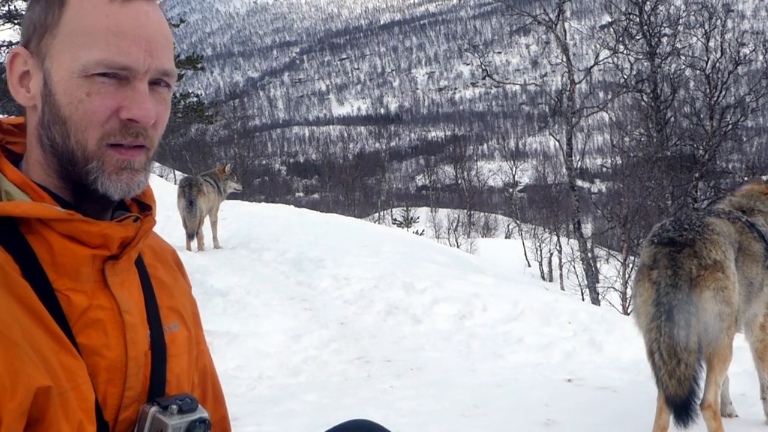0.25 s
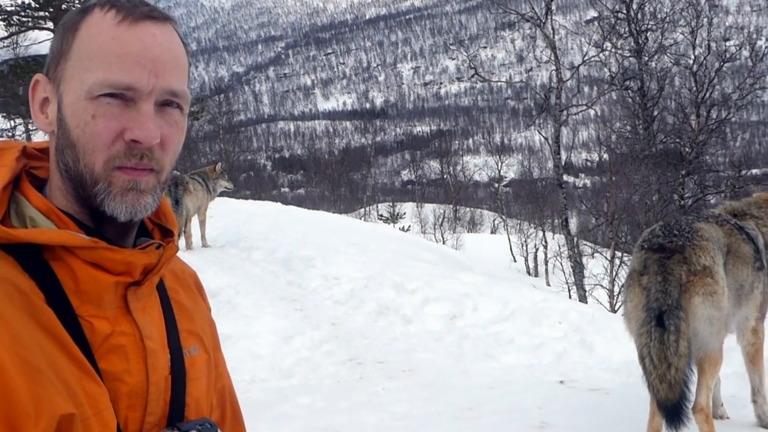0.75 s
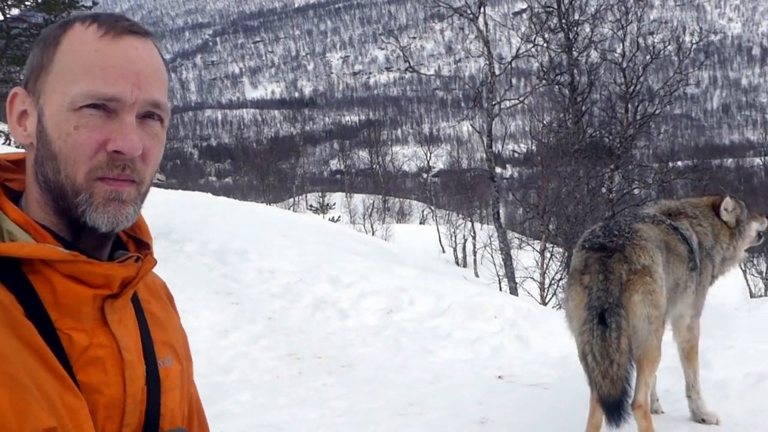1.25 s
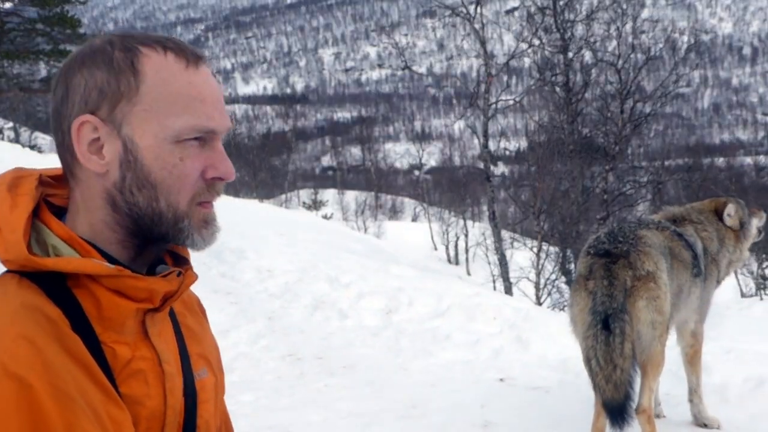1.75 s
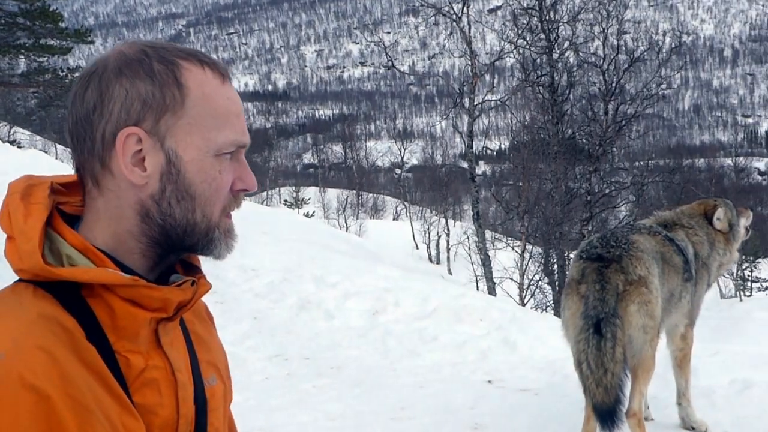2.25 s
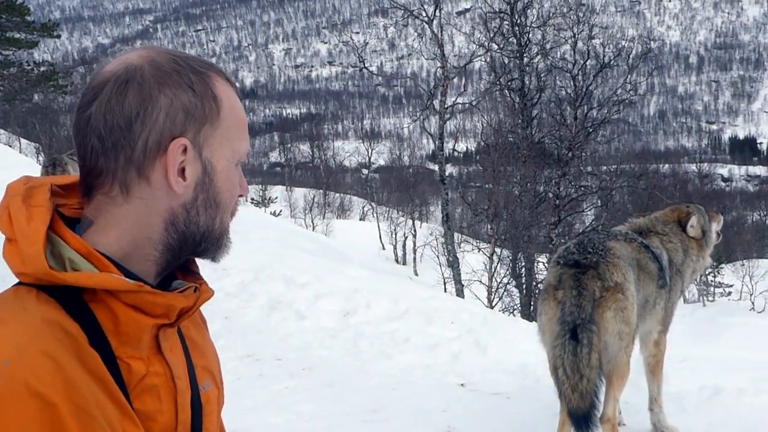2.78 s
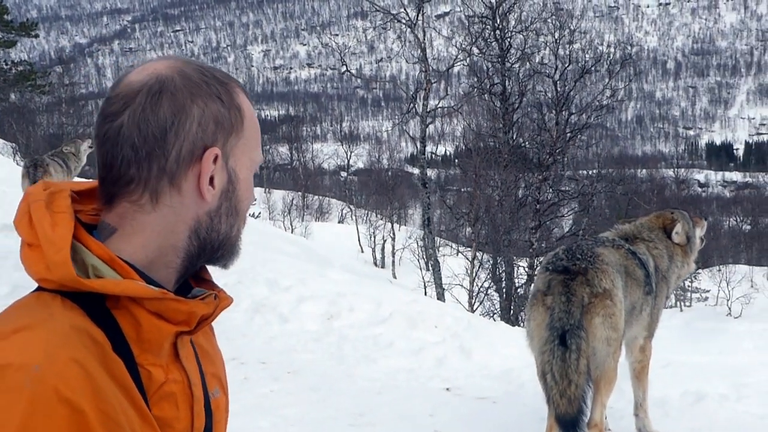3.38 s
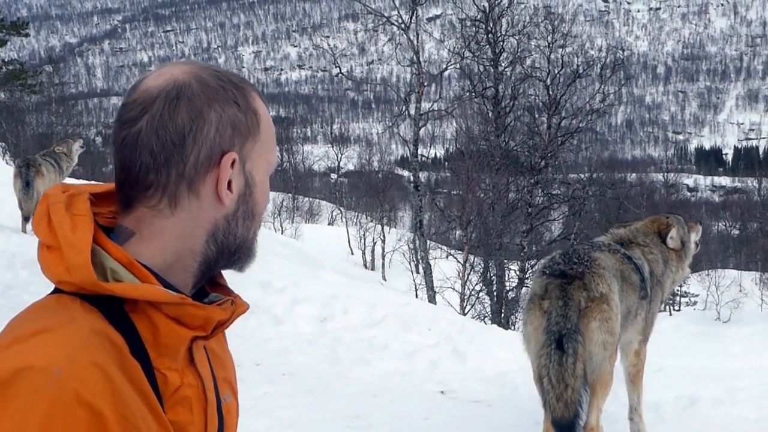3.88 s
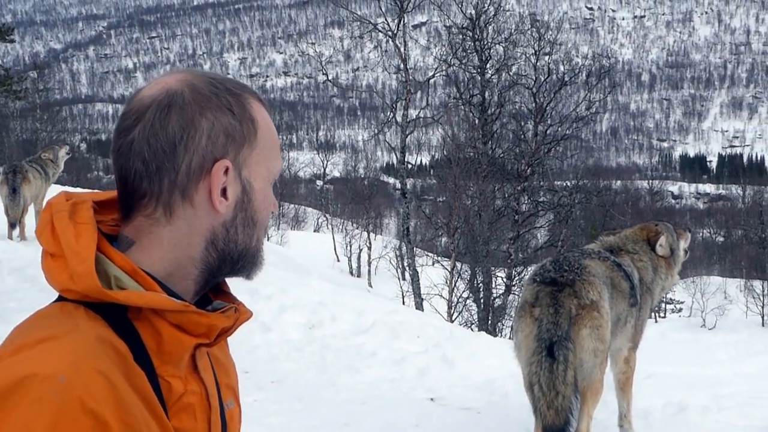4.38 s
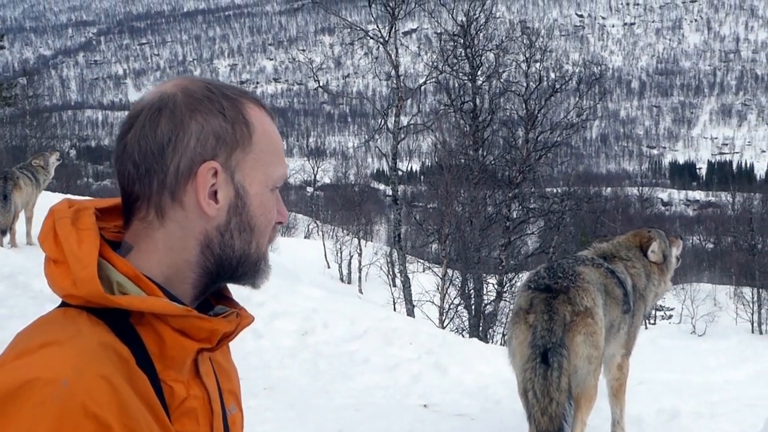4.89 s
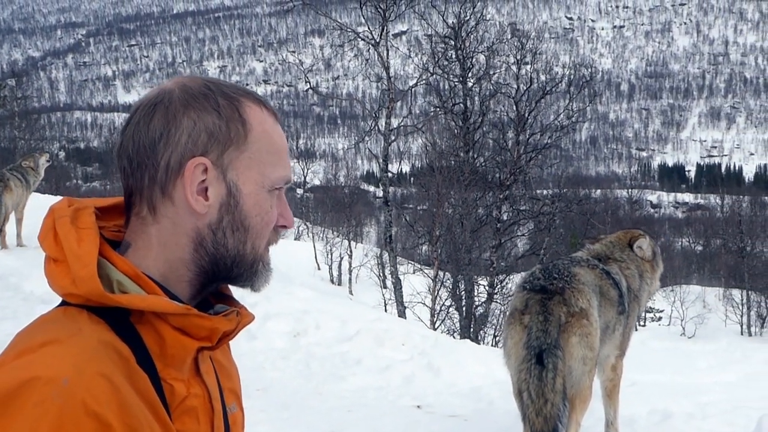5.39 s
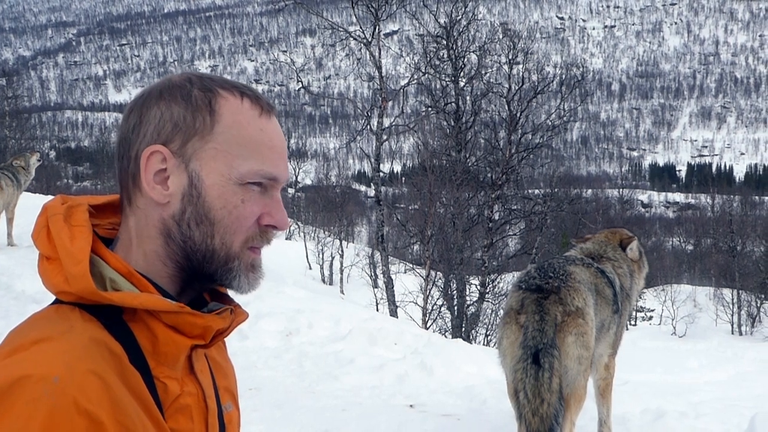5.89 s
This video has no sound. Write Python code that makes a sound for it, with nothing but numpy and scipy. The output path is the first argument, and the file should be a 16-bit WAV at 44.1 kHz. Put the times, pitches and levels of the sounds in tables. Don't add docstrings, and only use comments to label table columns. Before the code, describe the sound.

A handheld stereo microphone close to one wolf catches a pack chorus in a snowy valley. Far howls slide downward, soft and hoarse; then the near wolf's pure, powerful howl leaps up and settles lower, with a second wolf gliding high before falling to join it. Wind rumbles and pops in the ports, fading late. Near the end the close voice sags and flips, with slight paw crunches in snow.

```python
import sys
import numpy as np
from scipy import signal
from scipy.fft import rfft, irfft
from scipy.io import wavfile
from scipy.ndimage import uniform_filter1d

SR = 44100
rng = np.random.default_rng(int(sys.argv[2]) if len(sys.argv) > 2 else 0)


def volts_from_decibels(level):
    exponent = np.asarray(level, float) / 20
    return 10 ** exponent


def materialize(psi):
    bounded = np.clip(np.atleast_2d(psi).T, -1, 1)
    quanta = np.round(bounded * 32767).astype(np.int16)
    wavfile.write(sys.argv[1], SR, quanta)


N = 270774


def evened(x):
    return x / np.sqrt(np.mean(x ** 2) + 1e-20)


def read(points, hz):
    f, value = np.transpose(points)
    return np.interp(np.log(hz + 1), np.log(f + 1), value)


def curve(points, x):
    return np.interp(x, *np.transpose(points))


def add(mix, start_s, sound):
    part = mix[..., round(start_s * SR):][..., :sound.shape[-1]]
    part += sound[..., :part.shape[-1]]


def sided(x, lean_db):
    return x * volts_from_decibels(np.array([lean_db / 2, -lean_db / 2]).reshape(2, -1))


def drift(size, hz):
    return evened(signal.lfilter(*signal.butter(2, hz, fs=SR), rng.standard_normal(size)))


def bandpass(x, low_hz, high_hz, order):
    return signal.lfilter(*signal.butter(order, [low_hz, high_hz], "band", fs=SR), x)


def highpass(x, hz, order):
    return signal.sosfilt(signal.butter(order, hz, "high", fs=SR, output="sos"), x)


def peaks(modes, hz):
    return sum(volts_from_decibels(db) / (1 + (2 * (hz - centre_hz) / width_hz) ** 4) for centre_hz, width_hz, db in modes)


def noise(spectrum, same, flicker_db=0):
    frames, hz = N // 128 + 5, np.fft.rfftfreq(512, 1 / SR)
    a, b, c, d = rng.standard_normal((frames, 257, 4)).T
    left, other = a + 1j * b, c + 1j * d
    same = np.clip(same(hz), -1, 1)[:, None]
    z = np.array([left, same * left + np.sqrt(1 - same ** 2) * other])
    patches = uniform_filter1d(rng.standard_normal((257, frames)), 6, 0)
    patches = evened(uniform_filter1d(patches, 20, 1))
    z *= volts_from_decibels(read(spectrum, hz)[:, None] + flicker_db * patches)
    return evened(signal.istft(z, nperseg=512, noverlap=384)[1][:, :N])


def floor():
    # pitch_hz, level_db per Hz
    hiss = [(900, -17), (1500, -12), (2200, -9), (2900, -4.5), (4400, -2), (5600, -11.5), (6500, -6),
            (8000, -9.5), (9300, -7), (11500, -6.5), (15500, -27)]
    # pitch_hz, likeness (0-1)
    hiss_same = [(1000, .7), (3000, .45), (5000, .5), (12000, .55)]
    hiss_db = -65
    air_db = -66
    air_spectrum = [(60, -30), (300, -8), (680, 4), (1100, -2), (2200, -8), (3000, -25), (5000, -60)]
    air = noise(air_spectrum, lambda hz: .8 + 0 * hz, 1.5)
    return volts_from_decibels(hiss_db) * noise(hiss, lambda hz: read(hiss_same, hz), 1.2) + volts_from_decibels(air_db) * air


def wind_db(t):
    # time_s, level_db
    breeze = [(0, -62), (.44, -52), (.56, -38), (1.0, -36.5), (2.0, -36), (2.2, -45), (2.85, -35),
              (3.12, -31), (3.3, -34), (3.47, -44), (4.39, -39), (4.5, -61), (5.7, -51), (5.9, -68),
              (6.09, -70), (6.14, -57)]
    # peak_s, peak_db, fall_s per 10 dB
    gusts = [(0, -50.5, .1), (.15, -47.5, .07), (.36, -44.5, .07), (1.15, -25, .08), (1.35, -22.5, .13),
             (1.61, -23.5, .15), (1.9, -26, .25), (2.105, -21, .03), (2.51, -27, .33), (3.38, -29, .06),
             (3.57, -28.5, .1), (3.76, -30.5, .25), (4.11, -31, .17), (4.87, -45, .08), (5.16, -46, .13),
             (5.44, -31, .035), (5.8, -32.5, .035)]
    rise_share = .75
    levels = [db - 10 * np.maximum(t - s, (s - t) / rise_share) / fall_s for s, db, fall_s in gusts]
    return np.max([curve(breeze, t), *levels], axis=0)


def thumps(mix):
    # crest_s, peak_db, left_right_db, pitch_hz
    strikes = [(0.154, -37.0, 15.5, 138), (0.347, -35.8, 14.0, 163), (0.547, -29.0, 16.1, 196),
               (0.6, -28.3, 4.3, 157), (0.774, -28.0, -7.9, 236), (0.939, -24.6, -6.3, 212),
               (1.065, -21.7, 12.9, 179), (1.095, -18.9, 1.8, 235), (1.142, -17.3, 16.7, 183),
               (1.174, -18.8, 7.0, 222), (1.307, -15.2, 14.6, 234), (1.396, -12.4, 12.1, 218),
               (1.418, -15.1, -16.2, 209), (1.563, -20.2, -3.2, 208), (1.629, -17.3, 8.6, 216),
               (1.696, -15.8, 6.4, 246), (1.898, -22.0, 18.0, 183), (2.093, -13.7, 14.9, 228),
               (2.324, -22.5, -18.0, 177), (2.402, -21.9, -8.5, 234), (2.466, -19.1, -14.4, 204),
               (2.495, -14.9, -15.1, 214), (2.557, -17.7, -14.3, 226), (2.687, -17.6, -14.3, 178),
               (2.887, -18.5, -13.9, 208), (2.926, -22.9, -13.6, 204), (3.07, -23.0, -12.0, 207),
               (3.13, -20.3, 1.8, 207), (3.319, -24.0, -16.5, 213), (3.379, -18.6, -15.1, 195),
               (3.532, -22.6, -11.6, 203), (3.571, -19.4, -16.0, 230), (3.733, -20.6, -10.9, 151),
               (3.788, -21.9, -18.0, 216), (3.894, -24.4, -14.6, 165), (4.114, -19.6, -13.1, 173),
               (4.156, -22.7, -14.5, 193), (4.187, -20.5, -13.9, 223), (4.286, -22.7, -15.1, 157),
               (4.387, -28.3, -13.6, 221), (4.808, -38.4, -17.9, 144), (4.861, -37.1, -13.7, 165),
               (4.885, -39.6, -17.2, 155), (5.108, -37.8, -7.5, 183), (5.168, -37.0, -11.7, 134),
               (5.41, -32.6, -0.5, 236), (5.443, -25.2, -13.0, 185), (5.789, -20.3, -11.7, 196)]
    crest_cycles, trim_db = .62, 1.5
    for (s, db, lean_db, pitch_hz), phase in zip(strikes, rng.random(len(strikes))):
        u = np.arange(2400) / SR * pitch_hz / crest_cycles
        push = np.sin(2 * np.pi * (crest_cycles * u + phase)) * u ** 2 * np.exp(2 - 2 * u)
        push = sided(highpass(push, 90, 5), lean_db) / np.sqrt(np.cosh(lean_db * np.log(10) / 20))
        add(mix, max(s - crest_cycles / pitch_hz, 0), volts_from_decibels(db + trim_db) * push)


def wind():
    # pitch_hz, level_db
    buffet = [(30, -42), (50, -42), (70, -21.5), (110, -3.5), (190, 1.5), (300, -4), (450, -15), (800, -29),
              (1500, -49.5), (3000, -73)]
    # time_s, left_right_db
    wind_lean = [(0, 3.5), (1.8, 4), (2.4, -7), (4.4, -8), (6.14, -0.5)]
    # pitch_hz, level_db per Hz
    rumble = [(70, -3), (110, 0), (170, -8), (260, -30), (600, -70)]
    rumble_db = -57
    lumps_db, lumps_hz = 3.0, 22
    pops_per_s, pops_db, spread_db = 28, 22, 5.0

    t, hz = np.arange(N) / SR, np.fft.rfftfreq(N, 1 / SR)
    shared = drift(N, lumps_hz)
    lumps = volts_from_decibels(lumps_db * np.array([.6 * shared + 2.1 * drift(N, lumps_hz) for _ in range(2)]))
    raw = rng.standard_normal((2, N))
    raw[1] = 0.72 * raw[0] + 1.1 * raw[1]
    raw *= lumps / np.sqrt(uniform_filter1d(lumps ** 2, 6000))

    size = volts_from_decibels(pops_db + spread_db * np.minimum(rng.exponential(1, (2, N)), 3))
    size *= rng.choice([-1, 1], (2, N))
    pops = size * (rng.random((2, N)) < pops_per_s / SR)
    raw = evened(raw + pops) * volts_from_decibels(wind_db(t) - 0.8)

    gain = volts_from_decibels(read(buffet, hz))
    eddies = irfft(rfft(raw) * gain, N) / np.sqrt(np.mean(gain ** 2))
    eddies = sided(eddies, curve(wind_lean, t))
    thumps(eddies)
    bed = volts_from_decibels(rumble_db) * noise(rumble, lambda hz: .5 + 0 * hz, 3)
    return eddies + highpass(bed, 75, 6)


def ticks(mix):
    # start_s, peak_db, centre_hz, left_right_db
    snaps = [
        (2.5885, -44.5, 11710, 2.5),
        (3.245, -48, 11080, -3.5),
        (3.345, -50, 12200, 1),
        (5.0374, -49, 11620, 2.5),
        (5.1043, -41.5, 4000, 6),
        (5.3442, -40.5, 4146, 8),
    ]
    t = np.arange(400) / SR
    for s, db, hz, lean_db in snaps:
        burst = rng.standard_normal(400) * np.exp(-t / .0012)
        ring = bandpass(burst, .8 * hz, 1.13 * hz, 2)
        add(mix, s, sided(volts_from_decibels(db) * ring / abs(ring).max(), lean_db))


def crunches(mix):
    # start_s, length_s, level_db, centre_hz
    steps = [(.06, .2, -68, 3600), (.075, .04, -57, 1250), (.17, .08, -63, 1250), (.79, .03, -62, 1700),
             (1.1, .04, -52, 650), (1.78, .2, -67, 3400), (3.07, .12, -68, 3700), (3.62, .07, -62, 2000),
             (3.71, .06, -58, 1900), (3.8, .06, -59, 1900), (3.9, .06, -60, 1950), (4.01, .06, -58, 1850),
             (3.85, .16, -65, 3300), (5.68, .09, -64, 3400), (5.68, .2, -60, 1900), (5.86, .2, -66, 2200),
             (3.5, .2, -63, 1750), (3.3, .2, -65, 1800), (5.75, .09, -61, 2600), (5.85, .08, -63, 3000),
             (5.95, .08, -63, 2800), (5.4, .2, -63, 1600)]
    for s, length_s, db, hz in steps:
        grains = rng.standard_normal((2, 9000)) * volts_from_decibels(2.5 * rng.exponential(1, 9000))
        grains = (grains + grains[0])[:, :int(length_s * SR)]
        grains = bandpass(grains, .72 * hz, 1.28 * hz, 3)
        add(mix, s, volts_from_decibels(db) * evened(grains) * np.hanning(grains.shape[1]))


def small():
    out = np.zeros((2, N))
    ticks(out)
    crunches(out)
    return out


def hills(x):
    # pitch_hz, t60_s
    echo_t60 = [(200, 0.57), (800, 0.52), (2000, .5), (8000, .3)]
    taps = np.zeros((2, SR))
    at = np.arange(1800, SR - 20, 20) + rng.integers(0, 20, (2, (SR - 1801) // 20))
    np.put_along_axis(taps, at, rng.choice([-1., 1.], at.shape), 1)
    taps[1] = .8 * taps[0] + .6 * taps[1]
    hz, t, z = signal.stft(taps, SR, nperseg=256)
    tail = signal.istft(z * volts_from_decibels(-60 * t / read(echo_t60, hz)[:, None]), SR, nperseg=256)[1]
    return signal.fftconvolve(x.mean(0)[None], tail / np.linalg.norm(tail[0]), axes=1)[:, :N]


def howl(rows, third, strain, throat, mouth=(), waver=.003, hoarse=((0, -38),), roll_db=0,
         jaw=((0, 0, 1, 0, 1),)):
    s, *columns = np.transpose(rows)
    t = np.arange(s[0], s[-1], 1 / SR)
    hz, effort_db, edge_db = (uniform_filter1d(np.interp(t, s, c), 300) for c in columns)
    jaw_s, *shape = np.transpose(jaw)
    jaw_db, stretch, open_db, reach = (np.interp(t, jaw_s, c) for c in shape)
    third_db = jaw_db + curve(third, hz) + 1.6 * drift(len(t), 12)
    strain_db = curve(strain, t)

    phase = 2 * np.pi * np.cumsum(hz * (1 + waver * drift(len(t), 40))) / SR
    shimmer = 1 + volts_from_decibels(curve(hoarse, t)) * drift(len(t), 380)
    partials = zip((1, 2, 3), (effort_db, edge_db, third_db))
    voice = sum(volts_from_decibels(db) * np.sin(k * phase) for k, db in partials) * shimmer

    slow = slice(None, None, 64)
    shut_db = 0.098 * np.maximum(330 - hz[slow], 0)
    for k in range(4, int((throat[-1][0] + 900) / hz.min())):
        gain = volts_from_decibels(strain_db[slow] + roll_db * max(k - 6, 0)) * peaks(throat, k * (hz / stretch)[slow])
        mouth_db = open_db[slow] + third_db[slow] - 7.5 * (k - 4) - shut_db
        gain = gain + volts_from_decibels(mouth_db) * peaks(mouth, k * (hz / reach)[slow])
        come_and_go = evened(uniform_filter1d(rng.standard_normal(len(gain)), 60))
        gain = gain * volts_from_decibels((1.4 + .12 * k) * come_and_go)
        voice += np.repeat(gain, 64)[:len(t)] * np.sin(k * phase + k * k) * (2 * shimmer - 1)

    fade_in, fade_out = t - s[0] + (s[0] == 0), s[-1] - t + (s[-1] > 6.13)
    fade = np.minimum(1, np.minimum(fade_in, fade_out) / .015)
    return s[0], np.sqrt(2) * voice * fade


def far_wolves(out):
    # time_s, pitch_hz, first_partial_db, second_partial_db
    far_high = [(0.0, 497, -44, -56), (0.14, 508, -43, -53), (0.36, 490, -45, -56),
                (0.585, 461, -45.5, -54), (0.915, 423, -41, -57), (1.3, 370, -46.5, -47)]
    far_long = [(0, 484, -52, -60), (.09, 469, -51, -52), (.15, 432, -41.5, -53), (.3, 419, -42, -55),
                (.765, 407.6, -42.5, -62), (1.4, 369, -39.5, -60), (1.75, 389, -43, -59),
                (2.35, 368, -45, -58), (3.3, 363, -53, -66)]
    far_drop = [(2.27, 695, -41, -56), (2.37, 658, -41, -47), (2.45, 615, -48, -48),
                (2.62, 549, -54.5, -63.5)]
    far_low = [(3.75, 295.4, -49, -56.5), (4.125, 312, -54, -51.5), (5, 322, -62, -50.5),
               (5.35, 310, -59, -48.5)]
    far_last = [(5.75, 528, -67, -58.5), (6.14, 542, -59.5, -53)]
    # pitch_hz, level_db
    high_third = [(370, -74), (422, -49), (440, -54), (456, -62), (505, -68)]
    # time_s, level_db
    high_strain = [(0, -52), (.7, -56), (.92, -70), (1.3, -60)]
    long_strain = [(.12, -84), (.2, -68), (.5, -63), (2.9, -64), (3.2, -78)]
    # centre_hz, width_hz, level_db
    far_throat = [(1500, 300, -8), (1900, 400, 0), (2450, 300, -26)]
    for rows, third, strain, lean_db in [
            (far_high, high_third, high_strain, -.6),
            (far_long, [(0, -72)], long_strain, -.4),
            (far_drop, [(0, -66)], [(0, -68)], .2),
            (far_low, [(0, -67)], [(0, -67)], .2),
            (far_last, [(0, -81)], [(0, -72)], .2)]:
        s, sound = howl(rows, third, strain, far_throat, waver=.0023, roll_db=-3.5, hoarse=[(0, -20)])
        add(out, s, sided(sound, lean_db))


def second_wolf(out):
    # time_s, pitch_hz, first_partial_db, second_partial_db
    second_rise = [(1.7, 528, -52, -65), (1.76, 566, -44, -52), (1.895, 582, -43, -50),
                   (1.97, 558, -54, -57), (2.06, 598, -45, -50), (2.125, 648, -31, -46),
                   (2.21, 700, -25, -46), (2.235, 735, -36, -47)]
    second_arc = [(2.405, 758, -35, -46), (2.63, 808, -37.5, -44), (2.82, 780, -34, -45),
                  (2.86, 772, -33.5, -58), (2.9, 764, -32.5, -46), (3.2, 689, -21, -51),
                  (3.395, 660, -24, -48), (3.485, 622, -35, -42), (3.6, 590, -33, -39),
                  (3.65, 548, -40, -29)]
    second_fall = [(3.72, 543, -40, -36), (3.935, 516, -39, -43), (4.08, 483, -43, -41),
                   (4.4, 460, -36, -40), (4.55, 444, -42, -45), (4.67, 420, -28, -37),
                   (4.76, 405, -32, -35), (4.82, 379, -27.5, -37)]
    second_hold = [(5.1, 367.5, -28, -37), (5.7, 364, -28, -38), (6.14, 357.5, -30, -42)]
    # pitch_hz, level_db
    second_third = [(365, -46), (381, -40), (412, -51), (480, -54), (545, -52), (578, -63), (615, -59),
                    (650, -68), (675, -74), (760, -80)]
    # time_s, level_db
    second_strain = [(1.7, -65), (2.35, -61), (2.9, -70), (4.1, -66), (4.5, -66), (4.68, -58), (4.9, -68),
                     (5.4, -61), (6.14, -58)]
    # centre_hz, width_hz, level_db
    second_throat = [(1500, 320, -3), (1900, 300, -5), (2400, 300, -13), (3850, 400, -13), (4600, 180, -9)]
    rows = second_rise + second_arc + second_fall + second_hold
    s, sound = howl(rows, second_third, second_strain, second_throat, waver=.0023, roll_db=-3.5,
                    hoarse=[(0, -34)])
    add(out, s, sided(sound, .3))


def near_wolf(out):
    # time_s, pitch_hz, first_partial_db (effort), second_partial_db (edge)
    near_rise = [(1.17, 278, -32, -53), (1.2, 315, -37, -29), (1.235, 350, -21, -31),
                 (1.337, 391, -18, -22.5), (1.346, 515, -35, -28), (1.355, 538, -24, -13.5),
                 (1.373, 533, -27, -15), (1.384, 578, -19, -27), (1.4, 624, -17, -39)]
    near_crest = [(1.43, 649, -16, -41), (1.51, 686, -11, -52), (1.545, 698, -9, -49),
                  (1.58, 715, -11.5, -54), (1.615, 731, -8.5, -47), (1.66, 756, -13, -45),
                  (1.69, 774, -11, -41)]
    near_peak = [(1.722, 796, -17, -50), (1.748, 785, -12.5, -47), (1.81, 760, -11, -47),
                 (1.85, 743, -12, -54), (1.9, 732, -12, -66), (1.93, 729, -12, -58), (1.96, 710, -17, -48),
                 (1.99, 686, -19, -41), (2.015, 668, -24, -42), (2.055, 620, -26, -34),
                 (2.085, 586, -30, -21)]
    near_sway = [(2.2, 553, -28, -27), (2.35, 531, -28, -29), (2.55, 527.5, -27.5, -30),
                 (2.685, 511, -27.5, -27), (2.985, 510.5, -27, -26), (3.04, 504.5, -28, -28),
                 (3.315, 530, -27, -30), (3.56, 519, -28, -29), (3.74, 482, -25, -28)]
    near_hold = [(3.81, 429, -20, -25.5), (3.855, 427, -17, -25.5), (4.215, 410.7, -19.5, -26.5),
                 (4.92, 406.4, -19.5, -26), (5.04, 400, -21, -23), (5.1, 390, -23, -21),
                 (5.128, 382, -25, -15.5)]
    near_sag = [(5.14, 358, -33, -17), (5.17, 356, -35, -23), (5.26, 349, -36, -23.5),
                (5.32, 325, -40, -30), (5.39, 290, -44.5, -34.5), (5.52, 256, -54, -35),
                (5.62, 268, -56, -36), (5.7, 295, -39, -34.5)]
    near_flip = [(5.74, 344, -41, -26.5), (5.77, 386, -25, -15), (5.783, 400, -19, -28),
                 (5.803, 390, -19, -15), (5.816, 380, -28, -19), (5.826, 359, -42, -24),
                 (5.843, 356, -40, -19.5), (5.89, 351, -37, -26), (5.96, 352, -45, -20),
                 (6.04, 349, -38, -23), (6.14, 346, -37.5, -20)]
    # pitch_hz, level_db
    near_third = [(260, -32.5), (290, -40), (352, -37.5), (388, -47), (430, -46), (530, -53), (650, -51),
                  (735, -66), (795, -80)]
    # time_s, level_db
    near_strain = [(1.17, -72), (1.245, -64), (1.3, -50), (1.335, -58), (1.36, -52), (1.4, -60),
                   (1.52, -44), (1.6, -57), (1.7, -52), (1.9, -58), (1.98, -47), (2.0, -56), (2.08, -66),
                   (2.2, -68), (2.45, -60), (2.69, -52), (3.2, -53), (3.4, -57), (3.68, -57), (3.78, -55),
                   (4.1, -56), (4.3, -59), (4.9, -62), (5.1, -72), (5.16, -58), (5.25, -72), (5.5, -80),
                   (5.85, -70), (6.14, -72)]
    # centre_hz, width_hz, level_db
    near_throat = [(2070, 330, -10), (2625, 360, -2.5), (3120, 300, -23), (5050, 200, -29),
                   (6500, 400, -25.5), (9200, 500, -18.5), (9850, 450, -23)]
    # centre_hz, width_hz, level_db re third partial
    near_mouth = [(1440, 700, -8.5)]
    # time_s, level_db
    near_hoarse = [(1.17, -15), (1.22, -22), (1.25, -28), (1.325, -28), (1.342, -17), (1.36, -34),
                   (1.385, -23), (1.42, -36), (2.0, -38), (2.09, -33), (2.2, -38), (5.1, -38), (5.14, -30),
                   (5.2, -38), (5.74, -36), (5.79, -27), (5.83, -36)]
    # time_s, third_partial_db, throat_stretch (ratio), mouth_db, mouth_stretch (ratio)
    near_jaw = [(1.17, -6, 1, -6, 1), (1.22, -3, 1, 3, .9), (1.25, -7, 1, -12, 1), (1.285, 4, 1, -20, 1),
                (1.33, 4, 1, -18, 1), (1.345, -9, .99, -14, 1), (1.385, -11, 1, -14, 1),
                (1.41, 3, 1.01, 0, 1), (2.0, 0, 1, 0, 1), (2.06, -3, 1, -3, 1), (2.12, 4, 1.03, -3, 1),
                (2.3, 0, 1.03, -4, 1), (2.7, -1, 1, 0, 1), (3.7, 0, 1.02, 0, 1), (3.85, 2, .99, -6, 1),
                (4.05, 1, .97, 0, 1), (4.5, 0, 1.01, 2, 1), (5.0, 4, 1.04, 2, 1), (5.11, 4, 1.04, 0, 1),
                (5.15, 1, .94, 4, 1.12), (5.25, 0, .95, -3, 1), (5.33, 2, 1, 3, .9), (5.4, 0, 1, -8, .95),
                (5.62, 0, 1, -6, 1), (5.74, 0, 1, 0, .92), (5.8, -4, 1, -3, .95), (5.84, 0, .98, 1, 1.15),
                (6.14, -1, .98, 0, 1.15)]
    head_turn_db = .6
    rows = near_rise + near_crest + near_peak + near_sway + near_hold + near_sag + near_flip
    s, sound = howl(rows, near_third, near_strain, near_throat, near_mouth, waver=.0025,
                    hoarse=near_hoarse, jaw=near_jaw)
    add(out, s, sided(sound, -0.57 + head_turn_db * drift(len(sound), 4)))


def pack():
    # pitch_hz, left_right_db
    port_db = [(300, 0), (800, -.5), (1400, -2), (2000, -6), (2700, -0.5), (9000, -1.5)]
    # pitch_hz, left_lead_rad
    port_turn = [(300, .5), (1100, -.33), (1650, 0.062), (2100, 1), (2800, 0.56), (9000, 0.99)]
    out = np.zeros((2, N))
    far_wolves(out)
    second_wolf(out)
    near_wolf(out)
    size = N + 2000
    hz = np.fft.rfftfreq(size, 1 / SR)
    turn = np.exp(.5j * read(port_turn, hz)) ** [[1], [-1]]
    low_cut = 1 / (1 + (150 / (hz + 1)) ** 4)
    return irfft(sided(rfft(out, size), read(port_db, hz)) * turn * low_cut, size)[:, :N]


def scene():
    wolves = pack()
    return floor() + wind() + small() + volts_from_decibels(-24) * hills(wolves) + wolves


def band_limit(x):
    return signal.sosfilt(signal.butter(12, 15050, fs=SR, output="sos"), x)


def record(dry):
    return band_limit(dry)


dry = scene()
out = record(dry)
materialize(out)
```